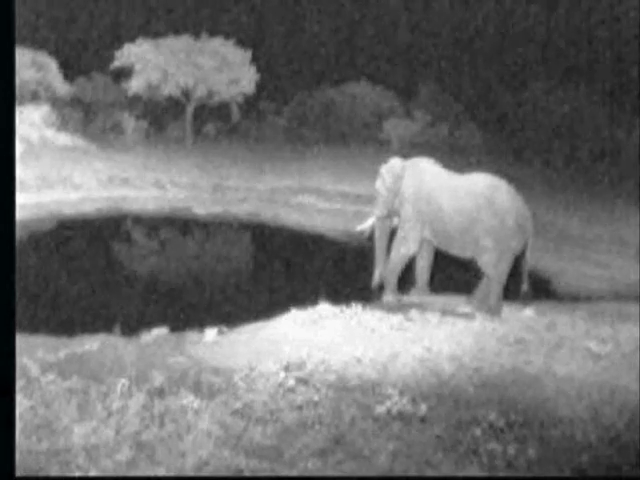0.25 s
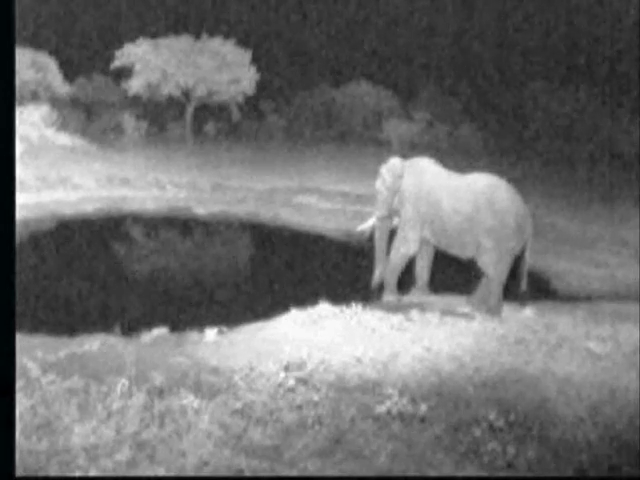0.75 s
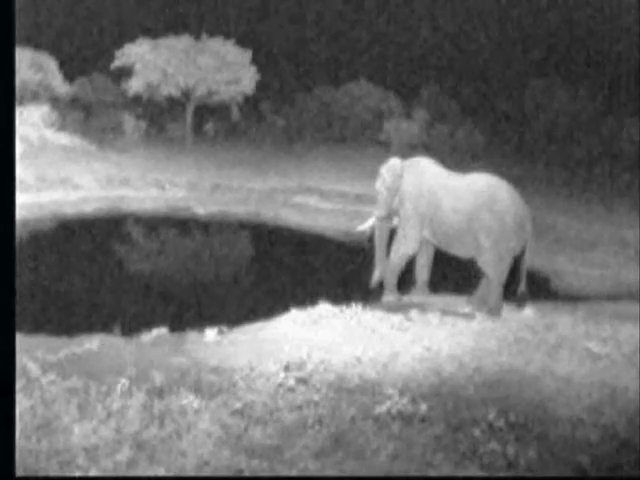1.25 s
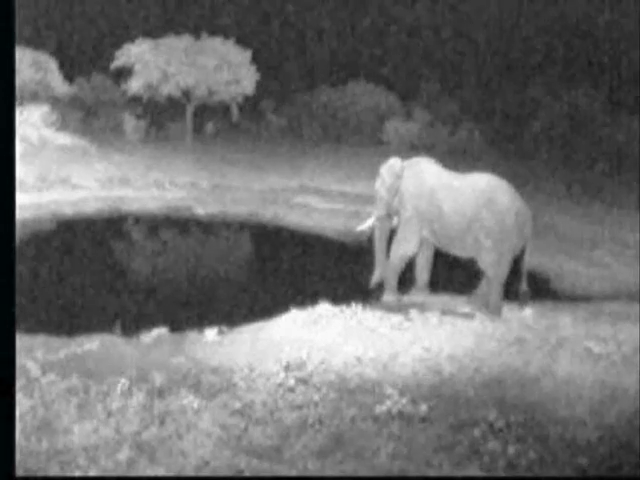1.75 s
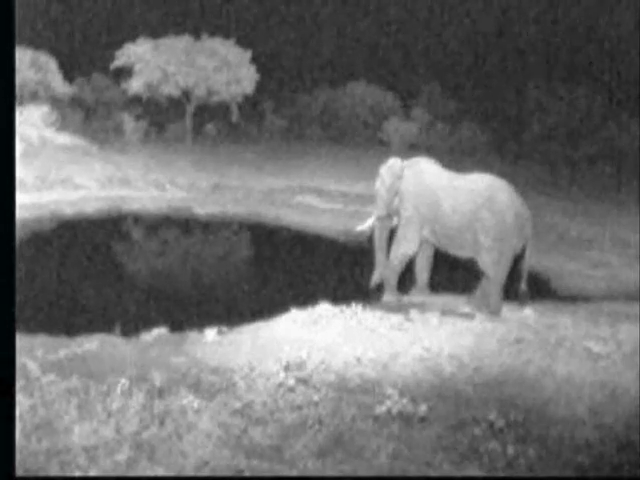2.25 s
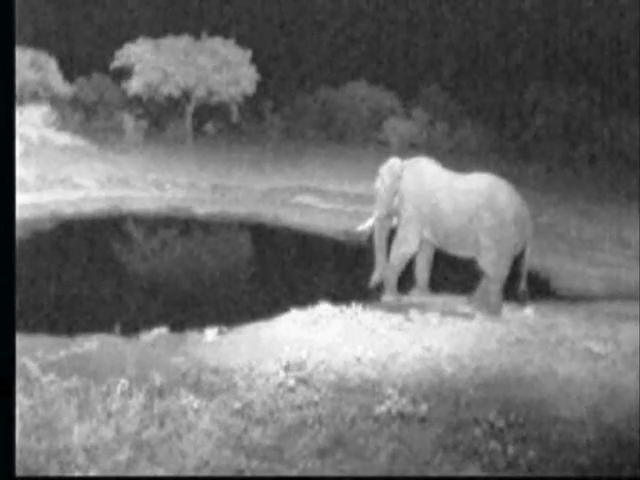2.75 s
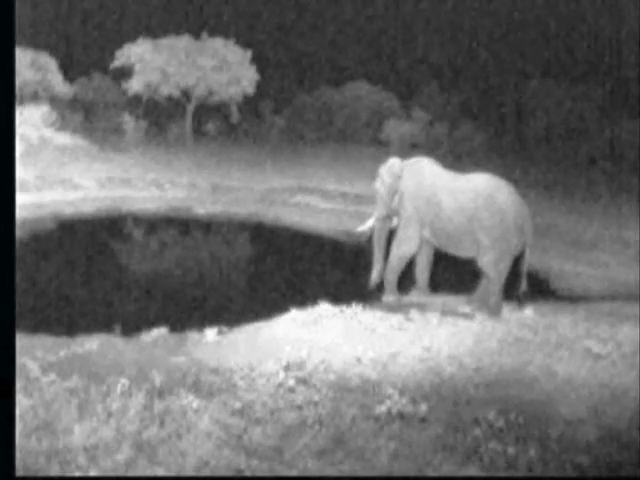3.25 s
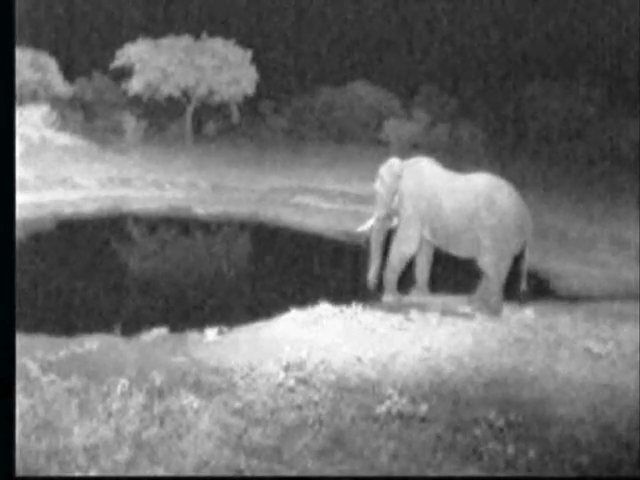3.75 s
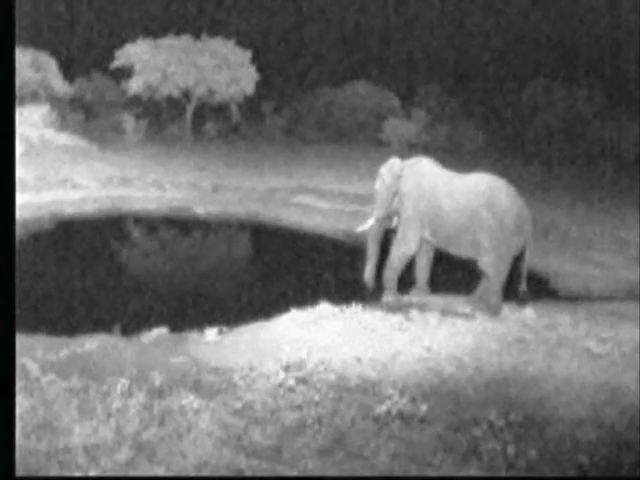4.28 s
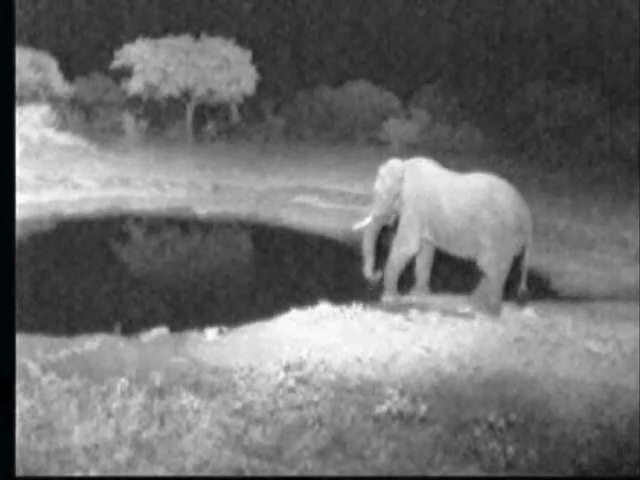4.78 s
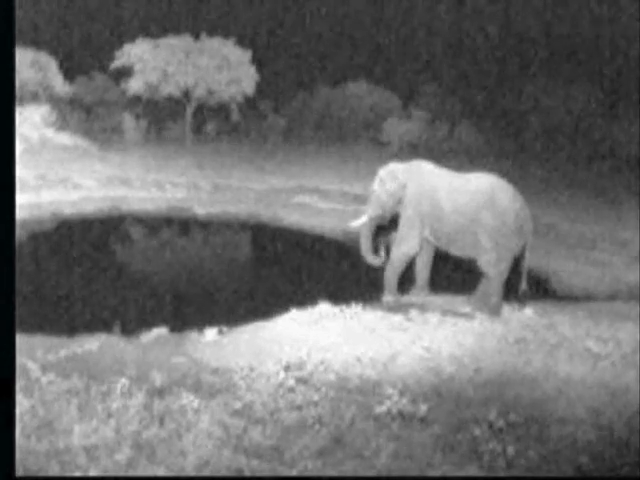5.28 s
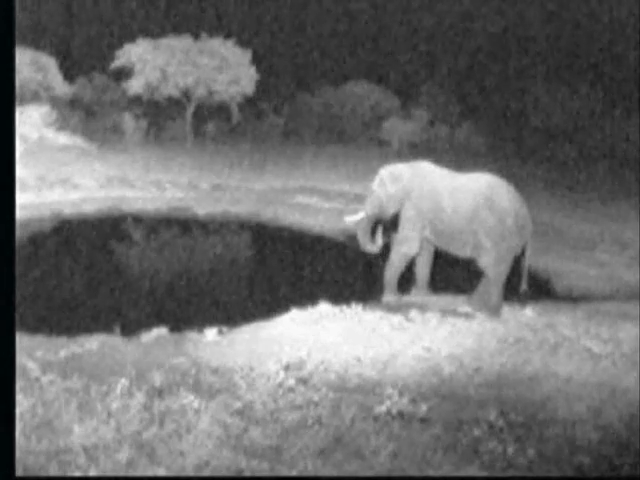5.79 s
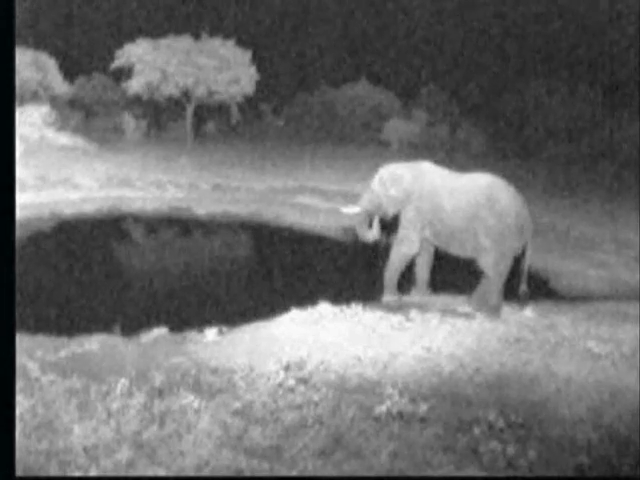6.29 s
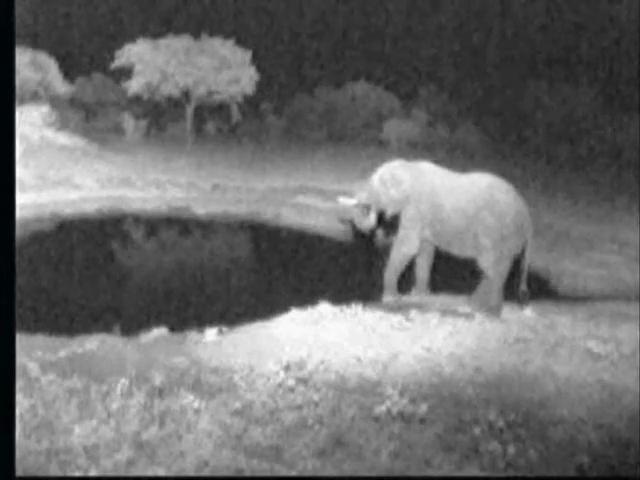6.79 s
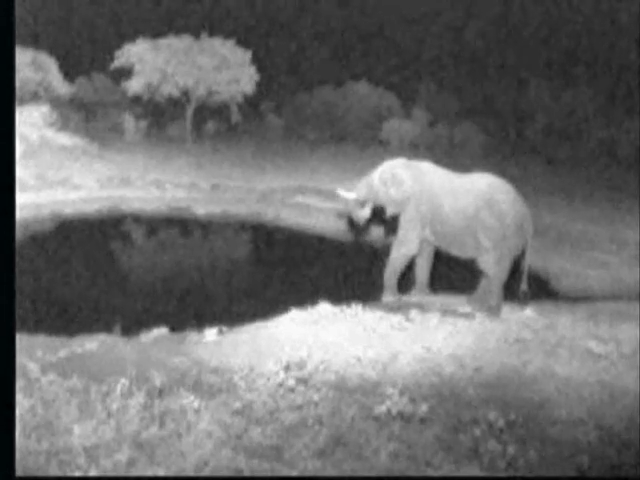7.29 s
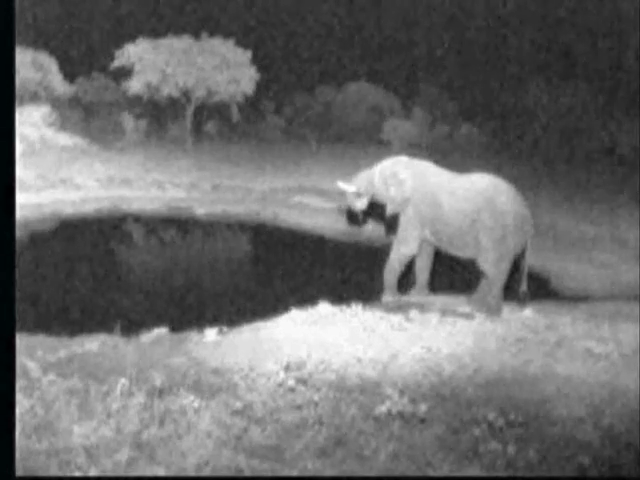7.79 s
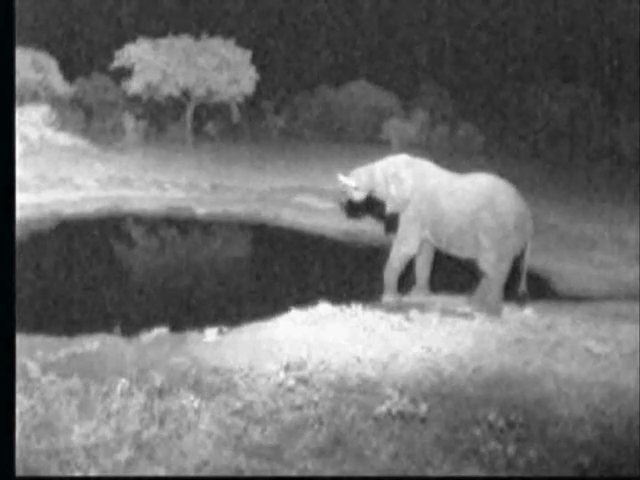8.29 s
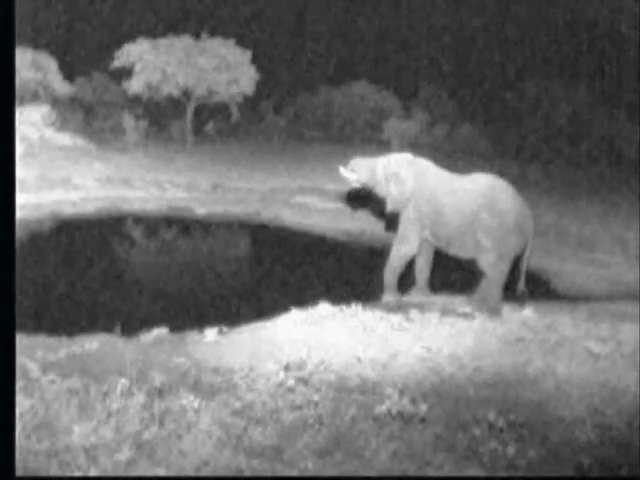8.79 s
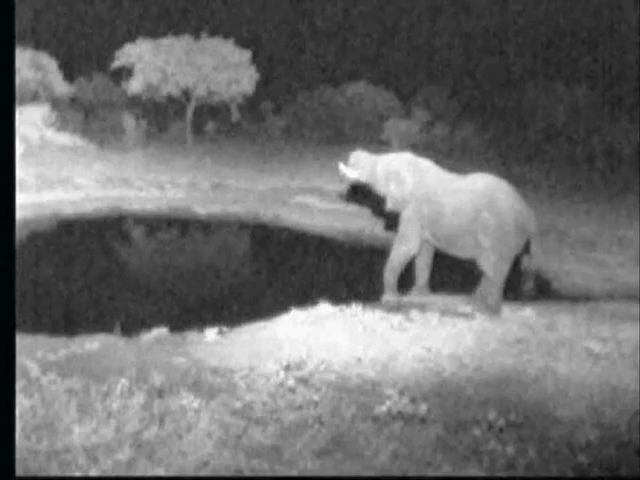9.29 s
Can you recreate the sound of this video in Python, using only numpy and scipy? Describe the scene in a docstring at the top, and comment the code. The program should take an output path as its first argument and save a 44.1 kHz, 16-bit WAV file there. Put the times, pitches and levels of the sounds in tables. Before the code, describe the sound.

An elephant splashes at a waterhole, gurgles water down its throat and blows a hissing jet, while frogs trill close by.

```python
"""A waterhole at night. Frogs throb across the pond and trill close by in trains of falling chirps.
An elephant sloshes up spray and ringing bubbles, lifts its dripping trunk and empties it into its mouth:
the water gurgles in the throat, then a long jet hisses and whistles through the trunk.
The outdoor microphone hums and overloads, and a coarse converter mirrors every sound into the treble."""
import sys
import numpy as np
from scipy import signal
from scipy.fft import rfft, irfft, next_fast_len
from scipy.io import wavfile

SR = 44100
rng = np.random.default_rng(int(sys.argv[2]) if len(sys.argv) > 2 else 0)


def persist_wave(psi):
    """Save psi, clipped to +-1, as 16-bit WAV."""
    counts = np.round(np.clip(psi, -1, 1) * 32767).astype(np.int16)
    wavfile.write(sys.argv[1], SR, np.atleast_2d(counts).T)


N = 420713
TIME = np.arange(N) / SR
BAND_HZ = 5512  # half the converter's sample rate


def amp(db):
    """Decibels to gain."""
    return 10 ** (np.asarray(db) / 20)


def unit_rms(x):
    """Normalises to rms 1."""
    return x / np.sqrt(np.mean(x ** 2) + 1e-20)


def unit_band(x, band_hz):
    """Normalises so that one band has rms 1."""
    return x / np.std(signal.sosfilt(signal.butter(4, band_hz, "band", fs=SR, output="sos"), x))


def noise():
    """White noise, as long as the scene."""
    return rng.standard_normal(N)


def wander(per_s):
    """A random modulator of rms 1, gliding between values."""
    knots = rng.standard_normal(8000)
    return unit_rms(np.interp(TIME * per_s, np.arange(len(knots)), knots))


def fader(curve):
    """Gain along a curve of (t/s, level/dB), silent outside it."""
    times, db = np.transpose(curve)
    return amp(np.interp(TIME, times, db, left=-120, right=-120))


def burst(start, rise_s, hold, t60):
    """Attack, hold and release envelope."""
    age = TIME - start
    return np.clip(age / rise_s, 0, 1) * amp(-60 * np.clip((age - hold) / t60, 0, 2))


def bursts(cues, rise_s, t60):
    """One envelope from cues of (t/s, hold/s, level/dB)."""
    return sum(amp(db) * burst(start, rise_s, hold, t60) for start, hold, db in cues)


def add(mix, start_s, sound):
    """Mixes a sound in, if it starts within the scene."""
    start = round(start_s * SR)
    if 0 <= start < N:
        mix[start:start + len(sound)] += sound[:N - start]


def eq(x, curve):
    """Filters by a curve of (f/Hz, level/dB) and cuts everything above BAND_HZ."""
    hz, db = np.transpose(curve)
    size = next_fast_len(N)
    freqs = np.fft.rfftfreq(size, 1 / SR)
    gain = amp(np.interp(np.log(freqs + 1), np.log(hz), db)) * (freqs < BAND_HZ)
    return irfft(rfft(x, size) * gain, size)[:N]


def resonate(x, hz, width_hz):
    """A steep resonance of gain 1 that may follow a pitch curve."""
    carrier = np.exp(2j * np.pi * np.cumsum(hz * np.ones(N)) / SR)
    pole = np.exp(-np.pi * width_hz / SR)
    return 2 * (carrier * signal.lfilter([(1 - pole) ** 2], [1, -2 * pole, pole ** 2], x / carrier)).real


def hollow(x, low_hz=446):
    """Low cut under the ring of trunk and throat."""
    return signal.sosfilt(signal.butter(8, low_hz, "high", fs=SR, output="sos"), x)


def scatter(flow, per_s, over_db, hz, pitch_spread, spread_db=3.5):
    """Random cues (t/s, level/dB, f/Hz) whose level rides a flow curve."""
    flow_s, flow_db = np.transpose(flow)
    chance = rng.standard_normal((200, 3))
    times = flow_s[0] + (np.arange(len(chance)) + chance[:, 0] / 2) / per_s
    loud, sharp = np.clip(chance[:, 1:], -2, 2).T
    levels = np.interp(times, flow_s, flow_db) + over_db + spread_db * loud
    cues = zip(times, levels, hz * np.exp(pitch_spread * sharp))
    return [cue for cue in cues if flow_s[0] < cue[0] < flow_s[-1]]


def bubble_swarm(per_s, spread_db, band_hz, cycles, sizes=24):
    """Many small bubbles, each a short rising ring; a few are much louder."""
    out = np.zeros(N)
    clicks = (rng.random(N) < per_s / SR) * amp(spread_db * np.minimum(rng.exponential(1, N), 3.5))
    clicks *= rng.choice([-1, 1], N)
    size = rng.integers(0, sizes, N)
    for k, hz in enumerate(np.geomspace(*band_hz, sizes)):
        age = np.arange(int(4 * cycles / hz * SR)) * hz / SR / cycles
        ring = np.sin(2 * np.pi * cycles * age * (1 + 0.024 * age)) * np.exp(-age * 1.55) * np.sqrt(hz)
        out += signal.oaconvolve(clicks * (size == k), ring)[:N]
    return unit_rms(out)


# Tone of the air bed: f/Hz, level/dB
AIR_EQ = [(20, 5), (120, 0.5), (260, 0.5), (350, -9), (450, -8), (560, 2.5), (700, -2), (1100, -7),
          (1800, -3.5), (2500, 5), (3000, -2), (5400, -2.5)]


def night_air(level_db=-37):
    """A soft, steady bed of noise over the pond."""
    return amp(level_db) * unit_rms(eq(noise(), AIR_EQ))


# Hum partials: multiple of the mains frequency, level/dB
HUM_PARTIALS = [(1, -44.5), (2, -46.5), (3, -38), (4, -58), (5, -38.5), (7, -50.5), (9, -49.5), (11, -44.5),
                (15, -52.5), (17, -66)]
# Fader ride on the odd partials: t/s, level/dB
ODD_SWELL = [(0, -10.5), (2, -12), (3.5, -5.5), (5, -3), (6.5, -1), (9.54, 2)]


def mains_hum(mains_hz=50.03):
    """Mains hum on the line; its odd harmonics swell."""
    out, swell = np.zeros(N), fader(ODD_SWELL)
    for k, db in HUM_PARTIALS:
        partial = amp(db) * np.sqrt(2) * np.cos(2 * np.pi * k * mains_hz * TIME)
        out += partial * (swell if round(k) % 2 else 1)
    return out


# Low-voiced calls across the pond: t/s, hold/s, level/dB
LOW_CALLS = [(0.104, 0.2, -32), (2.06, 0.6, -40), (2.94, 0.35, -34.5), (3.405, 0.27, -32.5),
             (3.88, 0.91, -36), (5.463, 2.9, -37)]
# Fader ride on the high chorus: t/s, level/dB
CHORUS_RIDE = [(0, -31.5), (2.4, -32.5), (3.9, -38.5), (4.7, -27.5), (5.3, -34), (6.35, -36), (9.54, -30)]


def far_frogs(throb_per_s=36, murmur_db=-39.5):
    """Distant trills blur into two bands: low throbbing calls over a murmur, and a high flicker."""
    turns = np.cumsum(throb_per_s * (1 + 0.188 * wander(12))) / SR
    throb = unit_rms(1 + 0.53 * np.sin(2 * np.pi * turns))
    low = unit_rms(resonate(noise(), hz=2215, width_hz=130)) * throb
    high = unit_rms(resonate(noise(), hz=4100, width_hz=620)) * amp(2.2 * wander(110))
    calls = bursts(LOW_CALLS, rise_s=0.047, t60=0.41)
    return low * np.hypot(calls, amp(murmur_db)) + high * fader(CHORUS_RIDE)


def pond_echo(reeds_db=-15, reeds_t60=0.087, bank_db=-20, bank_t60=0.24):
    """Impulse response: quick reflections off the reeds and a short tail from the banks."""
    t = np.arange(SR // 4) / SR
    reeds, bank = rng.standard_normal((2, len(t))) * amp(-60 * t / [[reeds_t60], [bank_t60]])
    return amp(reeds_db) * reeds / np.linalg.norm(reeds) + amp(bank_db) * bank / np.linalg.norm(bank)


# Close trills: first pulse t/s, last pulse t/s, crest level/dB, crest f/Hz
NEAR_TRILLS = [(-0.2, 0.077, -14.5, 4260), (0.005, 0.195, -13, 4060), (1.093, 1.5, -0.5, 4330),
               (1.661, 1.992, -13, 4120), (1.872, 2.205, 1.5, 4220), (2.043, 2.338, -1.5, 4306),
               (2.507, 2.712, -15.5, 4560), (2.543, 2.834, -21, 4610), (2.694, 3.146, -12.5, 4237),
               (2.81, 3.187, -22.5, 4530), (3.289, 3.666, -17.5, 4236), (3.687, 3.816, -26, 4610),
               (4.169, 4.51, 0, 4300), (4.619, 4.982, -18.5, 4310), (4.754, 5.213, -5.5, 4210),
               (5.427, 5.621, -13.5, 4180), (5.552, 5.95, -20, 4600), (5.898, 6.276, 3.5, 4275),
               (6.399, 6.61, -21.5, 4150), (7.034, 7.198, -8, 4420), (8.037, 8.346, -3.5, 4260),
               (8.692, 8.917, -9.5, 4230), (8.961, 9.286, -2, 4300)]


def near_frogs(pulses_per_s=46.3, pulse_s=0.018, sweep=0.26, pitch_rise=0.051, crest=0.75):
    """Each pulse is a falling chirp; through a trill they grow louder, longer, higher and sweep farther."""
    direct, send = np.zeros((2, N))
    for first, last, db, hz in NEAR_TRILLS:
        swell_db = 16.5 + 0.61 * db  # fainter trills swell less
        times = np.linspace(first, last, round((last - first) * pulses_per_s) + 1)
        chance = rng.standard_normal((40, 3))
        for at, (loud, sharp, wide) in zip(times, chance):
            slack = 1 - min((at - first) / (last - first) / crest, 1)  # 1 at the start, 0 from the crest
            length = pulse_s * (1 - 0.25 * slack) * (1.2 if at == last else 1)
            u = np.linspace(-1, 1, int(length * SR))
            fall = sweep * (1 - 0.1 * slack + 0.096 * wide) * length / pulse_s
            pitch = hz * (1 - pitch_rise * slack + 0.00805 * sharp - fall * u / 2)
            chirp = np.sin(2 * np.pi * np.cumsum(pitch) / SR) * np.cos(np.pi * u / 2) ** 2
            chirp *= amp(0.07 * loud - swell_db * slack)
            add(direct, at - length / 2, amp(db) * chirp)
            add(send, at - length / 2, amp(0.76 * db) * chirp)  # fainter frogs are farther off, and wetter
    return direct + signal.oaconvolve(send, pond_echo())[:N]


# Tone of fine spray: f/Hz, level/dB
SPRAY_EQ = [(300, -42), (600, -16.5), (1200, -17.5), (1900, -9.5), (2600, 0.5), (3100, 0), (3600, -1.5),
            (4300, -3.5), (5000, -4.5), (5500, -6)]


def spray(swarm, hiss=1.47):
    """Bright water texture: a swarm of tiny bubbles in hiss."""
    return unit_band(eq(swarm + hiss * noise(), SPRAY_EQ), (2500, 3600))


# Tone of churning water: f/Hz, level/dB
CHURN_EQ = [(200, -31), (380, -47), (520, -9), (700, -2), (1200, 0), (1600, 3), (2000, 1), (2800, -17),
            (5000, -29)]


def churn():
    """Coarse water texture: fewer, larger bubbles in a little noise."""
    swarm = bubble_swarm(per_s=600, spread_db=3.95, band_hz=(481, 2466), cycles=14.2)
    return unit_band(eq(swarm + 0.5 * noise(), CHURN_EQ), (1000, 1900))


# Flow off the lifted trunk: t/s, level/dB
RUNOFF_FLOW = [(4.13, -44), (4.2, -33), (4.67, -33), (5.25, -44.5), (5.85, -32.5), (6.4, -39.5),
               (6.75, -27), (7.5, -22.5), (8.41, -29)]


def runoff(trickle_db=-0.5, patter_db=-10):
    """Water runs off the trunk in a thin trickle and patters on the pond."""
    trickle = spray(bubble_swarm(per_s=1300, spread_db=1.3, band_hz=(913, 5430), cycles=21))
    return (amp(trickle_db) * trickle + amp(patter_db) * churn()) * fader(RUNOFF_FLOW)


# Featured dollops hitting the pond: t/s, level/dB, ring f/Hz, t60/s
DOLLOPS = [(0.376, -13, 3330, 0.028), (2.426, -14.5, 3050, 0.049), (4.137, -5.5, 2870, 0.055),
           (4.162, -6.5, 2460, 0.052), (4.205, -6.5, 2930, 0.06), (4.253, -6, 3130, 0.054),
           (4.295, -1, 2700, 0.04), (4.443, -3.5, 2720, 0.044), (4.472, -6, 2890, 0.026),
           (4.586, -13, 2830, 0.05), (4.633, -14, 2800, 0.039), (4.67, 0, 2750, 0.03),
           (4.903, 0, 2630, 0.026), (5.004, -4, 2640, 0.021), (5.675, -9, 3600, 0.028),
           (5.737, -8.5, 2780, 0.016), (5.828, -8, 2620, 0.021), (6.525, -18.5, 2440, 0.062),
           (7.148, -5.5, 2650, 0.037), (7.228, -12, 2980, 0.065), (7.305, -7.5, 2720, 0.057),
           (7.455, -7, 2790, 0.05), (7.678, -2.5, 2760, 0.028), (7.753, -4, 3095, 0.051),
           (7.917, -8, 2640, 0.04), (8.166, -12, 3320, 0.059)]


def drops(slap_db=-3, fizz_db=-6, ring_db=-1, attack_s=0.0016, big_t60=0.057, drip_t60=0.046):
    """Each drop traps a ringing bubble amid smaller ones; big, long-ringing drops also slap the pond."""
    out, t = np.zeros(N), np.arange(SR // 10) / SR
    slap_eq = [(100, -20), (400, -17), (650, 4), (1200, -7),
               (2000, -1.5), (2800, 4.5), (3700, -7), (5400, -6)]
    fizz_eq = [(800, -46), (1900, -24), (2800, 1), (3400, -5.5), (4200, -9), (5400, -14)]
    slap = amp(slap_db) * unit_rms(eq(noise(), slap_eq))
    fizz = amp(fizz_db) * unit_rms(eq(noise(), fizz_eq))
    drips = scatter(RUNOFF_FLOW, per_s=14, over_db=12, hz=2900, pitch_spread=0.101)
    for at, db, hz, t60 in DOLLOPS + [(*drip, drip_t60) for drip in drips]:
        span = slice(round(at * SR), round(at * SR) + len(t))
        envelope = 1.27 * amp(db - 60 * t / t60) * (1 - np.exp(-t / attack_s))
        ring = amp(ring_db) * np.sin(2 * np.pi * hz * t)
        add(out, at, envelope * (ring + fizz[span] + (t60 / big_t60) ** 4 * slap[span]))
    return out


# Low rumble under the loudest splashes: t/s, hold/s, level/dB
RUMBLE_CUES = [(0.974, 0.046, -32), (1.166, 0.25, -21.5), (4.094, 0.21, -33.5)]
# Tone of the rumble: f/Hz, level/dB
RUMBLE_EQ = [(15, 3), (90, -3), (180, -5), (330, -13.5), (600, -2), (1500, -32)]


def rumble():
    """Low noise swells under the loudest splashes."""
    return unit_rms(eq(noise(), RUMBLE_EQ)) * bursts(RUMBLE_CUES, rise_s=0.07, t60=0.46)


# Sweeps of the trunk: t/s, hold/s, spray level/dB, churn level/dB
TRUNK_SWEEPS = [(0.297, 0.25, -29.5, -38), (0.493, 0.24, -17.5, -28), (0.85, 0.024, -20.5, -40),
                (0.932, 0.055, -16.5, -47), (1.049, 0.073, -14, -37), (1.146, 0.35, -14.5, -23.5),
                (1.596, 0.08, -26, -22), (2.4, 0.05, -33.5, -34), (5.357, 0.071, -31, -39),
                (5.397, 0.0094, -16, -22), (5.442, 0.01, -13, -31)]


def sloshing(lumpy_db=2, lumps_per_s=55):
    """Each sweep throws up a surge of spray and churning water; longer surges drain back more slowly."""
    fine = spray(bubble_swarm(per_s=3500, spread_db=3, band_hz=(1187, 5720), cycles=9.6))
    thrown, churned = np.zeros((2, N))
    for start, hold, spray_db, churn_db in TRUNK_SWEEPS:
        surge = burst(start, rise_s=0.011, hold=hold, t60=0.32 + 2.43 * hold)
        thrown = np.maximum(thrown, amp(spray_db) * surge)
        churned = np.maximum(churned, amp(churn_db) * surge)
    return (fine * thrown + churn() * churned) * amp(lumpy_db * wander(lumps_per_s))


def slurp(start_s=0.98, length_s=0.06, level_db=-20, from_hz=620, to_hz=2270, bend=2.4, rough=0.058):
    """An air pocket closes at the trunk's tip, and its ring shoots upward ever faster."""
    progress = np.clip((TIME - start_s) / length_s, 0, 1)
    pitch = from_hz * (to_hz / from_hz) ** (progress ** bend) * (1 + rough * wander(400))
    envelope = 2 * np.sqrt(progress * (1 - progress))
    return amp(level_db) * envelope * np.sin(2 * np.pi * np.cumsum(pitch) / SR)


# Gulps in the trunk: t/s, hold/s, level/dB
TRUNK_GULPS = [(2.407, 0.059, -30), (3.052, 0.051, -26.5), (5.656, 0.038, -25), (5.907, 0.02, -24),
               (6.052, 0.052, -25), (8.501, 0.051, -10.5)]


def gulps():
    """Short gulps of water ring the trunk."""
    ring = unit_rms(hollow(resonate(noise(), hz=585, width_hz=170)))
    return ring * bursts(TRUNK_GULPS, rise_s=0.012, t60=0.3)


# Flow into the throat: t/s, level/dB
THROAT_FLOW = [(5.6, -55), (5.95, -39), (6.38, -41.5), (6.72, -17), (6.93, -13.5), (7.15, -21.5),
               (7.62, -21), (8.0, -26.5), (8.6, -33)]
# Throat resonances: f/Hz, width/Hz, level/dB
THROAT_MODES = [(570, 140, 0), (768, 110, -4.5), (1060, 155, -10)]


def gurgle(lumpy_db=3.5):
    """Lumps of falling water ring the throat in one long pour."""
    pour = noise() * amp(lumpy_db * wander(70))
    throat = sum(amp(db) * resonate(pour, hz, width) for hz, width, db in THROAT_MODES)
    return unit_rms(hollow(throat)) * fader(THROAT_FLOW)


# Featured bubbles: peak t/s, level/dB, f/Hz
BIG_BUBBLES = [(0.436, -20, 1370), (0.582, -21.5, 528), (0.724, -14, 1605), (0.755, -18.5, 970),
               (1.448, -12.5, 668), (1.636, -11.5, 707), (1.659, -14.5, 1213), (2.443, -24, 533),
               (3.085, -15.5, 558), (4.426, -18.5, 846), (5.211, -24.5, 1534), (5.414, -14.5, 1507),
               (5.416, -13, 1813), (5.926, -12, 666), (6.015, -18, 590), (6.52, -15, 662),
               (6.62, -10.5, 570), (6.695, -8.5, 632), (6.821, -7, 570), (6.911, -2.5, 597),
               (6.938, 2, 538), (7.026, -11, 620), (7.225, -12.5, 798), (7.403, -9, 627), (7.6, -7, 570),
               (8.391, -8.5, 741), (8.54, -2.5, 550), (8.559, -7, 601), (8.572, -15, 820)]


def bubbles(ring_s=0.031, gain_db=2, rise=0.013, rough=0.051, echo_db=-9, echo_t60=0.1):
    """Big bubbles and the gurgle's random glugs ring and rise a little; close reflections roughen them."""
    out, wobble = np.zeros(N), wander(400)
    age = np.arange(int(1.4 * ring_s * SR)) / (ring_s * SR)
    envelope = (3 * age * np.exp(1 - 3 * age)) ** 3  # peaks at age 1/3
    glugs = scatter(THROAT_FLOW, per_s=22, over_db=3.5, hz=586.6, pitch_spread=0.078)
    for at, db, hz in BIG_BUBBLES + glugs:
        pitch = hz * (1 + rise * (age - 1 / 3) + rough * wobble[int(at * SR):][:len(age)])
        ring = np.sin(2 * np.pi * np.cumsum(pitch) / SR)
        add(out, at - ring_s / 3, amp(db + gain_db) * envelope * ring)
    t = np.arange(SR // 10) / SR
    echo = rng.standard_normal(len(t)) * t * amp(-60 * t / echo_t60)
    return hollow(out + amp(echo_db) * signal.oaconvolve(out, echo / np.linalg.norm(echo))[:N])


# Dull thumps on the microphone: t/s, level/dB, length/s
MIC_THUMPS = [(8.45, -12, 0.013), (8.465, -6, 0.0044)]


def thumps():
    """A push and a pull of pressure as the jet starts."""
    out = np.zeros(N)
    for k, (start, db, length) in enumerate(MIC_THUMPS):
        add(out, start, (-1) ** k * amp(db) * np.hanning(int(length * SR)))
    return out


# Tone of the jet's hiss: f/Hz, level/dB
JET_EQ = [(200, -35), (600, -21), (800, -14), (1100, -19), (1450, -8), (1750, -7.5), (2300, -4),
          (3000, -0.5), (3400, -0.5), (4200, -2.5), (5000, -5), (5500, -6)]
# Tube resonances of the trunk: f/Hz, width/Hz, level/dB
TRUNK_MODES = [(313, 70, 0), (590, 182, 1)]


def jet(start_s=8.415, rise_s=0.026, emptying_s=0.93, clearing_s=0.41, waver_hz=45):
    """Air and water rush out of the trunk; as it empties, hiss yields to a hoarse whistle and tube tone."""
    def ramp(span_s, begin, end):
        return np.interp(TIME, [start_s, start_s + span_s], [begin, end])

    sputter = amp(wander(110))
    rush = noise() * sputter
    spatter = bubble_swarm(per_s=1500, spread_db=1.4, band_hz=(608, 5600), cycles=24.7) * sputter
    hiss = unit_band(eq(spatter + rush, JET_EQ), (1300, 3600))
    whistle_hz = ramp(emptying_s, 2680, 2640) + waver_hz * wander(14)
    whistle = unit_rms(resonate(noise(), whistle_hz, width_hz=410)) * amp(-1.2 * wander(12))
    tube = unit_rms(sum(amp(db) * resonate(rush, hz, width) for hz, width, db in TRUNK_MODES))
    return ramp(rise_s, 0, 1) * (hiss * amp(ramp(emptying_s, -8, -16))
                                 + whistle * amp(ramp(emptying_s, -21, -9.5))
                                 + tube * amp(ramp(clearing_s, -31, -20)))


def scene():
    """The mono mix at the microphone: bed, frogs, pond water and the drink."""
    background = night_air() + mains_hum() + far_frogs() + near_frogs()
    water = runoff() + drops() + rumble() + sloshing()
    drink = slurp() + gulps() + gurgle() + bubbles() + thumps() + jet()
    return (background + water + drink)[None]


# Microphone colour: f/Hz, level/dB
MIC_EQ = [(20, -3.5), (1500, 1), (3000, 1), (4300, 2.5), (5400, 3)]


def record(dry, knee=2.6, offset=0.016, top_hz=15650):
    """The preamp overloads; the converter holds each value four samples, mirroring the spectrum upward."""
    mic = eq(dry[0], MIC_EQ)
    driven = mic / (1 + abs(mic) ** knee) ** (1 / knee)
    narrow = signal.oaconvolve(driven, signal.firwin(101, BAND_HZ + 400, fs=SR), "same")
    held = np.repeat(np.clip(narrow + offset, -1, 1)[::4], 4)[:N]
    return signal.oaconvolve(held, signal.firwin(511, top_hz, window=("kaiser", 7), fs=SR), "same")[None]


dry = scene()
out = record(dry)
persist_wave(out)
```